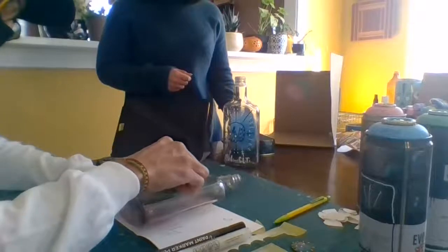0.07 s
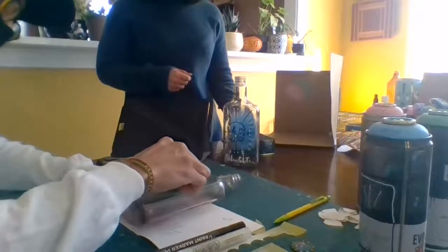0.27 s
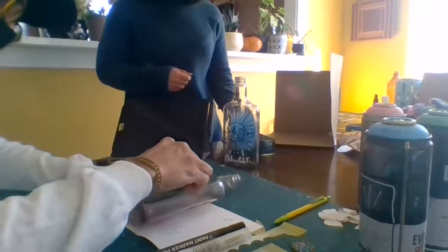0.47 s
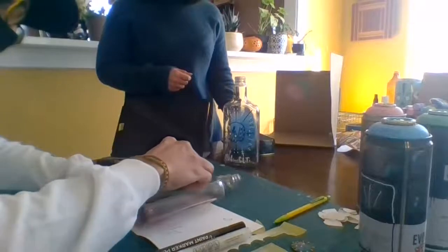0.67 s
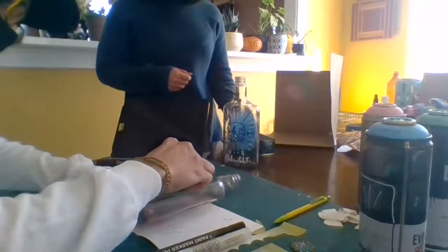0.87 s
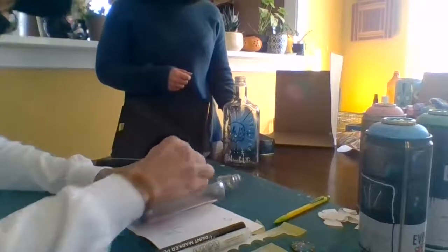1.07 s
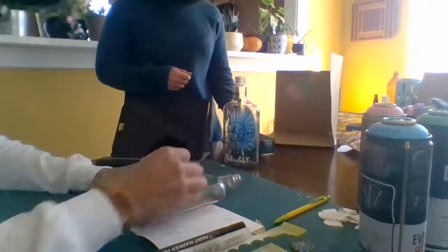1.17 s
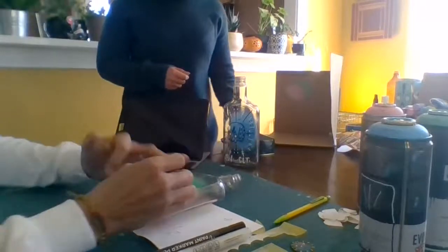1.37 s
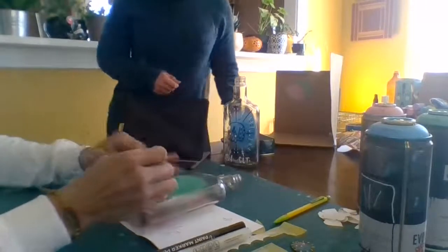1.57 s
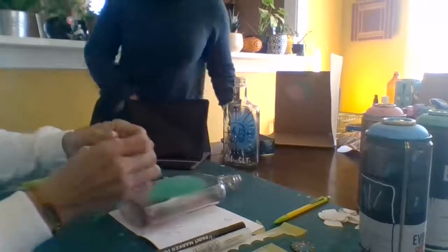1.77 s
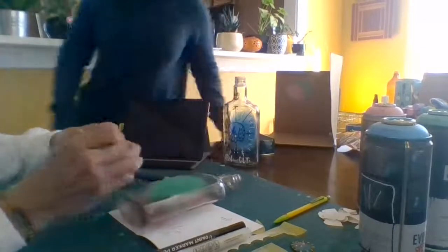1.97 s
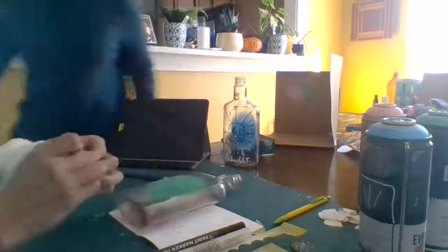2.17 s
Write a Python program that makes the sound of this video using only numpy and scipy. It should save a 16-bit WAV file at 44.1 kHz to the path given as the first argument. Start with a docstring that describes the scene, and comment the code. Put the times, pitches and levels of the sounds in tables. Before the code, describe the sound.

A blade scrapes a glass bottle in one raspy stroke, then a short sharp flick, indoors

```python
"""Low rumble and hiss of a small room, a soft thud and a crack; then a razor blade taps a glass bottle.
After two tap groups the blade scrapes one long stroke and one short flick: dense stick-slip clicks drive
decaying glass modes, and filtered clicks give the rasp heard directly. Sine swells are the table thudding
under the hands; filtered noise is the whistle, rub, scuffs, rumble, mids and rustle. One microphone hears all;
the bottle and the crack also reach it through a diffuse room tail."""
import sys
import numpy as np
from scipy import signal
from scipy.fft import rfft, irfft
from scipy.io import wavfile
from scipy.ndimage import uniform_filter1d

SR = 44100
rng = np.random.default_rng(int(sys.argv[2]) if len(sys.argv) > 2 else 0)


def digitize_waveform(pressure):
    """Quantize a signal to 16-bit integers and store it at the path in sys.argv[1].

    Rows of a 2-D input are taken as channels; values are limited to [-1, 1].
    """
    field = np.atleast_2d(pressure).T
    bounded = np.clip(field, -1, 1)
    quanta = np.round(bounded * 32767).astype(np.int16)
    wavfile.write(sys.argv[1], SR, quanta)


def volts(x):
    """Linear amplitude factor 10**(x/20) for a level x in dB, scalar or array-like."""
    e = np.asarray(x, float) / 20
    return 10 ** e


N = 98298  # length in samples


def level(x):
    """Scale to unit rms."""
    return x / np.sqrt(np.mean(x ** 2))


def colour(x, points):
    """Filter by (Hz, dB) points, -70 dB outside them before scaling; white noise keeps its rms."""
    p = np.array(points, float)
    hz = np.arange(len(x) // 2 + 1) * SR / len(x) + 1
    gain_db = np.interp(np.log(hz), np.log(p[:, 0]), p[:, 1], left=-70, right=-70)
    return irfft(rfft(x) * level(volts(gain_db)), len(x))


def curve(rows, axis=1):
    """A column joined by straight lines in time."""
    r = np.array(rows, float)
    return np.interp(np.arange(N) / SR, r[:, 0], r[:, axis])


def force(rows):
    """Gain following a dB curve, silent outside its first and last rows."""
    t = np.arange(N) / SR
    return volts(curve(rows)) * (t > rows[0][0]) * (t < rows[-1][0])


def walk(rate):
    """Random levels held 1 / rate seconds, then smoothed twice over that time."""
    k = int(SR / rate)
    steps = np.repeat(rng.standard_normal(N // k + 1), k)
    return 1.3 * uniform_filter1d(uniform_filter1d(steps, k), k)[:N]


def ring(x, hz, t60):
    """One decaying mode: a two-pole resonator, about unit height for a unit blow."""
    r, w = np.exp(-np.log(1000) / (t60 * SR)), 2 * np.pi * hz / SR
    return signal.lfilter([0, np.sin(w) * r], [1, -2 * r * np.cos(w), r * r], x)


def slips():
    """Stick-slip: the blade catches and lets go in random clicks of either sign and uneven size."""
    slips_per_s, spread_db = 12000, 4.0
    chance, side = rng.random((2, N))
    size = volts(spread_db * rng.standard_normal(N))
    return level((chance < slips_per_s / SR) * np.sign(side - .5) * size)


def rubbed(push, hz, t60):
    """A mode fed by slips under the envelope push, set to the mean energy of such a push."""
    y = ring(push * slips(), hz, t60)
    mean_energy = np.sum(push ** 2) * t60 * SR / (4 * np.log(1000))
    return y * np.sqrt(mean_energy / np.sum(y ** 2))


# Glass modes of the bottle. Each row: frequency in Hz, free ring time T60 in seconds.
GLASS_MODES = [(2018, .11), (2073, .17), (2150, .06), (3335, .11), (3415, .12), (3522, .1), (3634, .35),
               (4600, .12), (4690, .2), (4870, .08), (5560, .1), (5760, .1), (6195, .13), (6372, .11),
               (8032, .09), (8600, .07), (8870, .11), (9008, .055), (9400, .1), (9442, .12), (9915, .075),
               (10600, .06), (10785, .062), (11090, .07), (11195, .09)]
# How each mode answers the touch, one row per mode. Each row: relative level in dB at the long stroke's
# start, middle and end, at the flick's start and end, and at the tap spot.
TOUCH_DB = [(-13, -2, -17, -37, -40, 3), (-34, -27, -3.5, -46, -31.5, -10), (-15, -12.5, -35, -32, -34, -1),
            (-28, -18, -25, -28, -27, -6), (-27, -33, -8, -28, -19, -19), (-21, -16, -1, -34, -20, -17),
            (-11.5, -29.5, 0.5, -50, -23.5, -29), (5, -25, 0, -24, -15, -12.5),
            (-6, -24, -12, -24, -22, -19.5), (-39, -15, 2.5, -18, -27, -42),
            (-39, -8.5, -4, -9.5, -19.5, -27), (-22, -14, -4, -38, -26, -28),
            (-18.5, -5.5, -5, -31, -13.5, -36), (-1, -15, -11, -19, -16, -24),
            (-14, -11, -5, -30, -17.5, -38), (-10, 0, -9, -16, -33, -24), (6, -9.5, -2.5, -16, -33, -36),
            (1, 2, 7.5, 4, 0, -40), (-4, 0, -18, -4.5, -18, -38), (-0.5, -2, -20, -9, -16, -25),
            (6.5, -1.5, -4.5, -28, -18, -30), (-7, -14, -23, -20, -9, -44), (-18, -7, -6, -7, -23, -38),
            (-20, 3, -20, -23, -49, -37), (-18, -8, -17, -24, -25, -40)]
# Long stroke of the blade. Each row: time in seconds, force in relative dB,
# place along the stroke (0 start, 1 middle, 2 end).
STROKE = [(1.432, -68, 0.23), (1.455, -56, 0.091), (1.48, -42.5, 0.27), (1.51, -46.5, 1.27),
          (1.517, -38.5, 1.1), (1.535, -41, 0.61), (1.55, -41, 1.67), (1.57, -40, 1.64), (1.578, -47, 1.9),
          (1.6, -46, 1.62), (1.64, -53, 1.17)]
# Short flick of the blade. Each row: time in seconds, force in relative dB, place (0 start, 1 end).
FLICK = [(1.793, -49, 0.0), (1.797, -37, 0.032), (1.804, -36.5, 0.8), (1.812, -26.5, 0.7),
         (1.822, -27.5, 0.99), (1.832, -34.5, 1.0), (1.838, -44, 1.0), (1.85, -54, 1.0), (1.86, -50, 0.7)]


def glass_ringing():
    """Slips and taps ring each mode by the place touched; its level flutters as the grip shifts."""
    ring_db = -24  # ringing per unit of slip force
    held_stroke, held_tap = 0.37, 0.39  # share of the free ring time left under blade and hand
    ease_s, ease_db = 1.575, -5  # the blade eases off and slides on with less ringing
    flutter_db, flutter_per_s = 3.0, 70
    t = np.arange(N) / SR
    stroke, flick, taps = force(STROKE), force(FLICK), tap_push()
    stroke_place = np.clip(curve(STROKE, axis=2), 0, 2)
    flick_place = np.clip(curve(FLICK, axis=2), 0, 1)
    glass = 0
    for (hz, t60), (start, middle, end, flick_start, flick_end, tap_db) in zip(GLASS_MODES, TOUCH_DB):
        stroke_db = ring_db + ease_db * (t > ease_s) + np.interp(stroke_place, (0, 1, 2), (start, middle, end))
        flick_db = ring_db + flick_start + (flick_end - flick_start) * flick_place
        # each tap pushes at the mode's own pitch, with a random phase
        blow = taps * volts(tap_db) * np.cos(2 * np.pi * hz * t + 2 * np.pi * rng.random())
        mode = rubbed(stroke * volts(stroke_db), hz, t60 * held_stroke)
        mode = mode + rubbed(flick * volts(flick_db), hz, t60)
        mode = mode + ring(blow, hz, t60 * held_tap)
        glass = glass + mode * volts(flutter_db * walk(flutter_per_s))
    return signal.sosfilt(signal.butter(2, 1620, "high", fs=SR, output="sos"), glass)


# Taps of the blade on the glass. Each row: start in seconds, force in relative dB.
TAPS = [(.741, -54), (0.746, -50.5), (0.758, -62.5), (.775, -55), (1.176, -44.5), (1.186, -56.5),
        (1.806, -53)]


def tap_push():
    """Each tap is a push that starts at once and dies away exponentially."""
    push_s = .001
    t = np.arange(N) / SR
    push = 0
    for s, db in TAPS:
        push = push + volts(db) * (t > s) * np.exp(-np.abs(t - s) / push_s)
    return push * 2 / (push_s * SR)


# Spectrum of the long stroke's rasp. Each row: frequency in Hz, relative level in dB.
STROKE_RASP = [(300, -47), (500, -10), (720, -8.5), (950, -24), (1250, -1), (2000, -6.5), (2800, -3.5),
               (3600, 2.5), (6000, 4), (7500, 5.5), (9500, 6), (12000, -3)]
# Spectrum of the flick's rasp. Each row: frequency in Hz, relative level in dB.
FLICK_RASP = [(1200, -49), (1900, -25), (2600, -8.5), (4000, -15), (6000, -15), (7500, -11.5), (8800, 5),
              (10200, -2.5), (12000, -4)]


def rasp():
    """Blade and paint heard directly: the slip clicks, filtered, under each stroke's force."""
    stroke_db, flick_db = -7.5, -12.5  # relative to the force
    chatter = slips()
    stroke = volts(stroke_db) * colour(force(STROKE) * chatter, STROKE_RASP)
    return stroke + volts(flick_db) * colour(force(FLICK) * chatter, FLICK_RASP)


def bottle():
    """The ringing glass together with the direct rasp of the blade."""
    return glass_ringing() + rasp()


# Spectrum of the crack itself. Each row: frequency in Hz, relative level in dB.
TICK = [(1500, -15), (2200, -3.5), (4000, -2.5), (6000, -2.5), (7500, -14.5), (9500, -3), (12000, -21)]
# Spectrum of its grainy tail. Each row: frequency in Hz, relative level in dB.
TICK_TAIL = [(1800, -19), (2300, 0), (3000, -8), (4000, 1), (5000, -9), (7000, -11)]


def tick():
    """A crack of a few milliseconds with a grainy tail: random clicks under exponential decays."""
    t = np.arange(N) / SR - .3065  # seconds from the crack

    def fading(t60):
        return slips() * (t > 0) * 1000. ** (-np.abs(t) / t60)

    crack = colour(fading(0.0059), TICK)
    tail = colour(fading(0.12), TICK_TAIL)
    return volts(-47.5) * (crack + volts(-17.5) * tail)


def room(x):
    """Small room: a diffuse noise tail whose treble dies sooner, added to the direct sound."""
    room_db, t60_s, treble_t60_s, delay_s = -10, 0.25, 0.19, 0.0034
    t = np.arange(SR // 2) / SR
    noise = rng.standard_normal(len(t))
    low = colour(noise, [(100, 0), (4000, 0), (7000, -20)])
    low = low * np.dot(noise, low) / np.dot(low, low)  # the part to take out of the noise
    tail = low * 1000. ** (-t / t60_s) + (noise - low) * 1000. ** (-t / treble_t60_s)
    tail = tail * (t > delay_s)
    tail = tail / np.sqrt(np.sum(tail ** 2))
    return x + volts(room_db) * signal.fftconvolve(x, tail)[:N]


# Soft thuds and knocks on the table. Each row: centre in seconds, frequency in Hz, peak of the swell in dB,
# swell to 1/e in seconds.
THUDS = [(0.263, 133, -52.5, 0.0091), (.29, 128.4, -56.5, 0.027), (0.751, 314, -43, 0.0053),
         (0.761, 195, -50, 0.019), (0.763, 97, -56, 0.011), (0.812, 127, -48.5, .016),
         (.92, 213, -63, 0.021), (1.06, 147.4, -57.5, .015), (1.185, 186, -51.5, 0.0079),
         (1.315, 830, -69, 0.015), (1.383, 119, -58, 0.019), (1.607, 157.4, -53, 0.0069),
         (1.82, 202, -59.5, 0.011), (2.0, 604, -64.5, 0.011), (2.149, 1142, -63.5, 0.0075)]


def thuds():
    """The table under the hands: short swells of one resonance each, mostly low."""
    t = np.arange(N) / SR
    total = 0
    for s, hz, db, swell_s in THUDS:
        swell = np.exp(-((t - s) / swell_s) ** 2)
        total = total + volts(db) * swell * np.sin(2 * np.pi * hz * (t - s))
    return total


def narrow_noise(rows, hz, width_hz):
    """Noise through one resonance, following (s, dB) rows."""
    t60 = np.log(1000) / np.pi / width_hz
    return force(rows) * level(ring(rng.standard_normal(N), hz, t60))


# A light rub on one glass mode. Each row: time in seconds, level in dB.
RUB = [(.71, -109), (.73, -80), (.79, -75), (.83, -86), (.85, -98)]


def rub():
    """A light rub: noise through one glass mode."""
    return narrow_noise(RUB, hz=3650, width_hz=240)


# A faint narrow whistle. Each row: time in seconds, level in dB.
WHISTLE = [(0.4, -100), (.5, -75), (.56, -93), (.69, -84.5), (.73, -78.5), (.92, -92), (.955, -69.5),
           (.98, -81), (1.08, -84), (1.14, -89), (1.3, -81.5), (1.36, -100)]


def whistle():
    """A faint whistle: noise through one narrow resonance."""
    return narrow_noise(WHISTLE, hz=1855, width_hz=45)


# Brief rough swells of handling noise. Each row: centre in seconds, frequency in Hz, width in Hz,
# level at the peak in dB, swell to 1/e in seconds.
SCUFFS = [(.15, 690, 254, -76, 0.034), (.46, 670, 199, -76.5, .025), (.5, 1350, 200, -80, 0.033),
          (.8, 320, 147, -64, 0.043), (.9, 325, 148, -68, 0.032), (1.479, 730, 199, -68, 0.037),
          (1.65, 1360, 494, -72, 0.042), (2.048, 3270, 300, -73, 0.014), (2.158, 1760, 680, -74, 0.023)]


def scuffs():
    """Handling noise: swells of noise, each through one resonance."""
    t = np.arange(N) / SR
    total = 0
    for s, hz, width_hz, db, swell_s in SCUFFS:
        steady = narrow_noise([(0, db), (N / SR, db)], hz, width_hz)
        total = total + steady * np.exp(-((t - s) / swell_s) ** 2)
    return total


# Level of the low rumble. Each row: time in seconds, level in dB.
RUMBLE_LEVEL = [(0, -69.5), (.4, -70), (.7, -69), (.9, -63.5), (1.0, -68), (1.15, -62.5), (1.3, -68),
                (1.5, -67.5), (1.75, -64.5), (1.9, -66.5), (2.05, -70), (2.23, -68.5)]
# Spectrum of the rumble. Each row: frequency in Hz, relative level in dB.
RUMBLE_COLOUR = [(40, -41.5), (80, -13), (120, -1), (160, -1), (210, -2.5), (270, -9), (400, -21),
                 (600, -59)]
# Level of the mids. Each row: time in seconds, level in dB.
MID_LEVEL = [(0, -81), (.15, -80), (.4, -81), (.5, -76.5), (.56, -79), (.9, -78.5), (1.15, -79),
             (1.32, -75.5), (1.6, -80), (1.8, -74.5), (1.97, -72.5), (2.1, -75), (2.23, -82)]
# Spectrum of the mids. Each row: frequency in Hz, relative level in dB.
MID_COLOUR = [(250, -17.5), (450, 3), (750, -2.5), (1300, -5), (1600, -10), (2000, -14), (2500, -39.5)]
# Treble rustle of hands up to the long stroke: a list holding one curve. Each row: time in seconds, level in dB.
RUSTLE_EARLY = [
    [(0.0, -76.5), (0.248, -78.5), (0.3, -74), (0.692, -79), (0.75, -71.5), (1.126, -80), (1.178, -72.5),
     (1.356, -76), (1.42, -75.5)],
]
# The rustle from then on. Each row: time in seconds, level in dB.
RUSTLE_LATE = [(1.699, -59.5), (1.79, -65.5), (1.95, -62), (2.06, -69), (2.1, -71), (2.23, -72)]
# Spectrum of the rustle and hiss. Each row: frequency in Hz, relative level in dB.
HISS_COLOUR = [(2000, -10), (3000, -19.5), (4500, -5), (7500, -5), (9300, 1), (11000, -4), (12000, -15.5)]


def background():
    """Rumble, mids and the treble rustle of hands: three coloured noises whose levels waver."""
    low, mid, high = rng.standard_normal((3, N))
    rumble_db = curve(RUMBLE_LEVEL) + 0.71 * walk(24)
    mid_db = curve(MID_LEVEL) + 1.24 * walk(16.2)
    rustle_db = curve(list(RUSTLE_EARLY[0]) + list(RUSTLE_LATE)) + .8 * walk(20.85)
    rumble = volts(rumble_db) * colour(low, RUMBLE_COLOUR)
    mids = volts(mid_db) * colour(mid, MID_COLOUR)
    return rumble + mids + volts(rustle_db) * colour(high, HISS_COLOUR)


def scene():
    """Everything at one microphone; only the bottle and the crack excite the room tail."""
    near = room(bottle() + tick())
    handling = thuds() + whistle() + rub() + scuffs()
    return (near + handling + background())[None]


def low_pass(x):
    """Removes everything above the highest recorded frequency."""
    return signal.sosfilt(signal.butter(12, 12190, fs=SR, output="sos"), x)


def record(dry):
    """The microphone signal through a steep top cut at 12.1 kHz."""
    top_cut = signal.ellip(8, .1, 60, 12100, fs=SR, output="sos")
    mix = signal.sosfilt(top_cut, dry)
    return low_pass(mix)


dry = scene()
out = record(dry)
digitize_waveform(out)
```